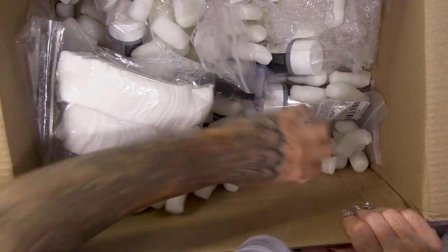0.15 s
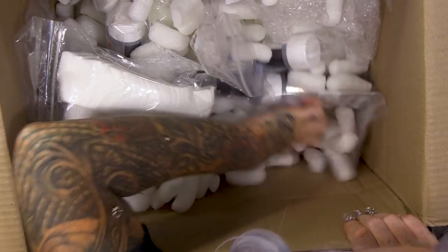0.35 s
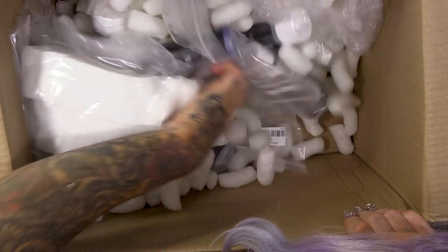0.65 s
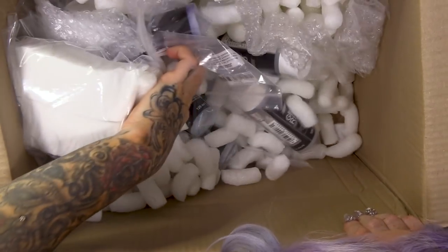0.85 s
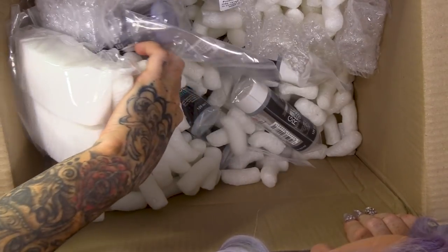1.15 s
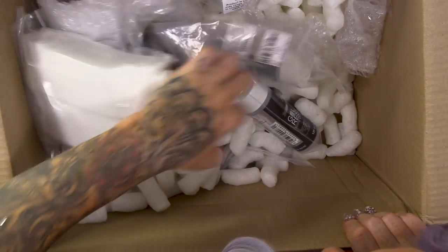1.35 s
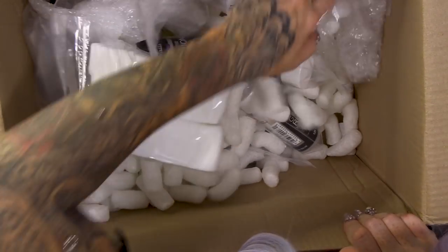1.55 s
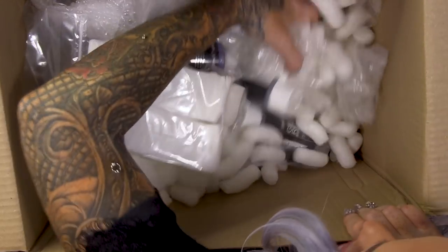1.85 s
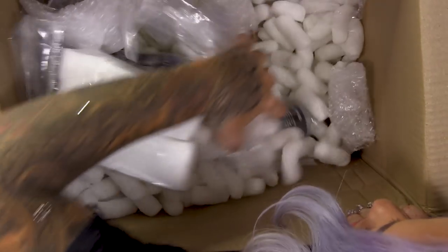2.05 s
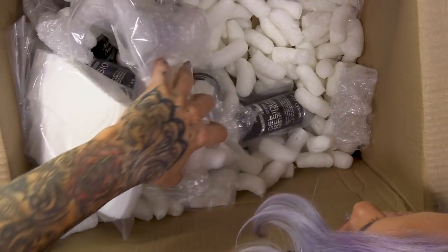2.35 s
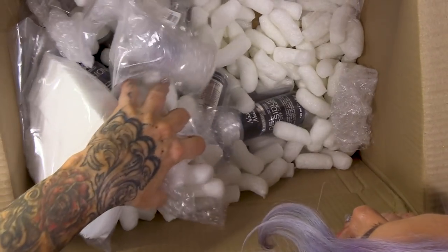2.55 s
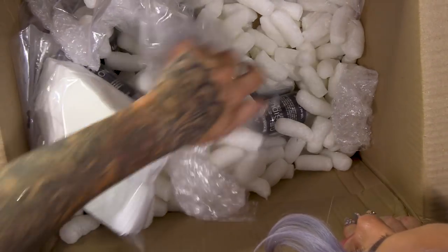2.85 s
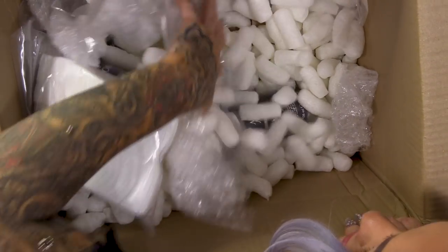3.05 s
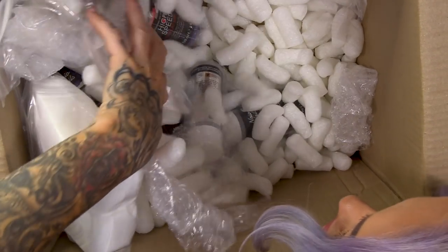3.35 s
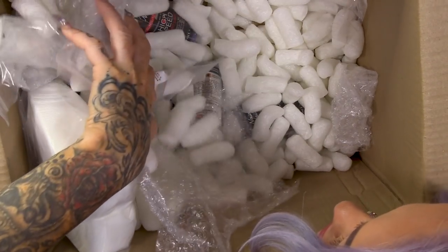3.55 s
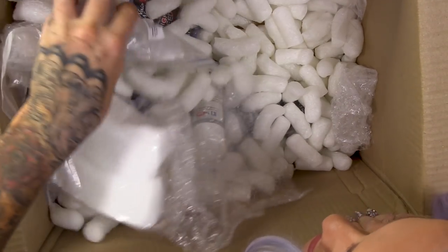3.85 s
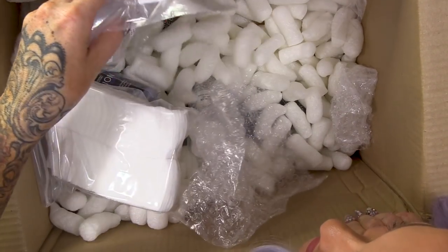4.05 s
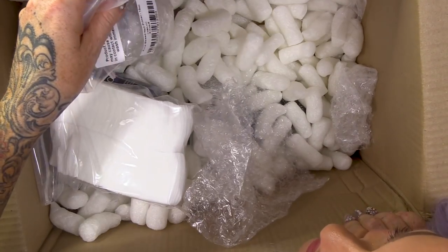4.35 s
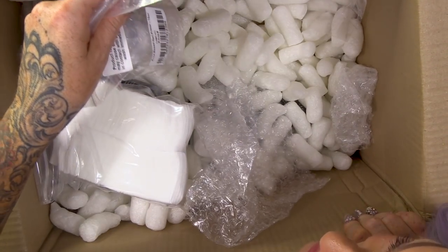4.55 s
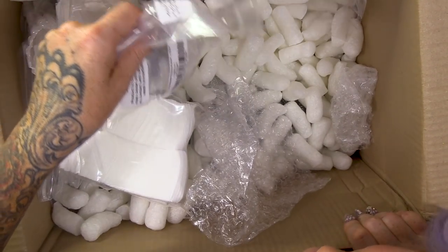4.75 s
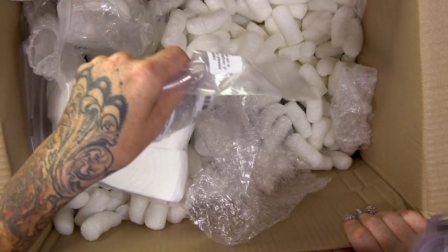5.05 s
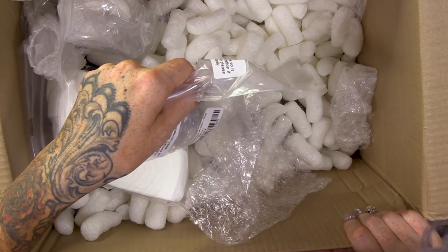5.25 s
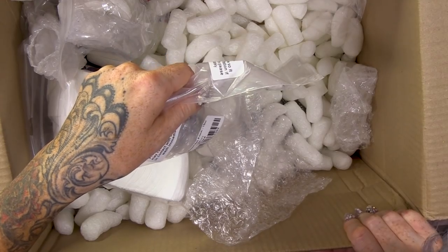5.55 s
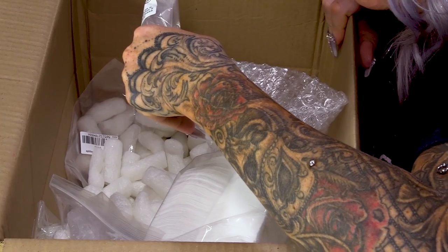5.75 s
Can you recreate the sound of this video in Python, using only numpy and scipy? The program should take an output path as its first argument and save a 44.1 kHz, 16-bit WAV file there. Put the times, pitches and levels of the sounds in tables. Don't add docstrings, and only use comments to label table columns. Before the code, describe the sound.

A hand digs through foam packing and crackly plastic, bumping cardboard, then pulls out a bag whose crinkles thin to tiny ticks.

```python
import sys
import numpy as np
from scipy import signal
from scipy.io import wavfile
from scipy.ndimage import uniform_filter1d

SR = 44100
rng = np.random.default_rng(int(sys.argv[2]) if len(sys.argv) > 2 else 0)


def makeup_ratio(level_db):
    decades = np.asarray(level_db, float) / 20
    return 10 ** decades


def digitize_waveform(pressure):
    field = np.atleast_2d(pressure).T
    bounded = np.clip(field, -1, 1)
    quanta = np.round(bounded * 32767).astype(np.int16)
    wavfile.write(sys.argv[1], SR, quanta)


N = 260217

# start_s, share
SMOOTH_SHARE = [(0, 1), (3.3, 0.95), (3.7, .8), (4.2, 0.65), (5.25, 0.65), (5.4, .6), (5.9, 0.6)]
STREAK_DB = 5


def evened(x):
    return x / np.sqrt(np.mean(x ** 2) + 1e-20)


def coloured(x, points):
    f, db = np.transpose(points)
    hz = abs(np.fft.fftfreq(8192, 1 / SR))
    log_gain = np.log(makeup_ratio(np.interp(np.log(hz + 1), np.log(f), db, -70, -70)))
    taps = np.fft.ifft(np.exp(np.conj(signal.hilbert(log_gain)))).real[:4096]
    return signal.oaconvolve(x, taps)[:len(x)]


def coloured_noise(points):
    return evened(coloured(rng.standard_normal(N), points))


def add(mix, s, sound):
    part = mix[round(s * SR):][:len(sound)]
    part += sound[:len(part)]


def drift(rate_hz):
    lowpass = signal.butter(2, rate_hz, fs=SR, output="sos")
    return evened(signal.sosfilt(lowpass, rng.standard_normal(N)))


def grains(per_s, spread_db, burst_s, bed, clumps):
    size = makeup_ratio(spread_db * np.minimum(rng.exponential(1, N), 4))
    size = size * (rng.random(N) < per_s / SR * np.exp(clumps))
    kind = rng.integers(0, 10, N)
    t = np.arange(600) / SR
    out = np.zeros(N)
    for k, burst in enumerate(rng.standard_normal((10, 600))):
        age = t / (burst_s * (0.38 + k / 12))
        shape = burst * age * np.exp(-age)
        out += signal.oaconvolve(size * (kind == k), shape / np.linalg.norm(shape))[:N]
    return evened(out) + bed * rng.standard_normal(N)


def patches(x, centres_hz, width):
    out = 0
    for hz in np.clip(centres_hz, 300, 17000):
        r = np.exp(-np.pi * width * hz / SR)
        stage = [1 - r, 0, r - 1, 1, -2 * r * np.cos(2 * np.pi * hz / SR), r * r]
        out = out + signal.sosfilt([stage, stage], x)
    return out / abs(out).max()


def patchy(x, depth_db, frames=12, bins=14):
    z = signal.stft(x, nperseg=256, noverlap=192)[2]
    field = uniform_filter1d(rng.standard_normal(z.T.shape), size=frames, axis=0)
    field = uniform_filter1d(field, size=bins, axis=1)
    depth_db = np.interp(np.arange(len(field)) * 64, np.arange(N), depth_db)[:, None]
    return signal.istft(z * makeup_ratio(depth_db * evened(field)).T, nperseg=256, noverlap=192)[1][:N]


def quiet_floor():
    # pitch_hz, level_db (per Hz)
    air_colour = [(25, 5), (90, 2), (180, -28), (500, -4), (1500, -27.5), (4000, -26), (8000, -31.5),
                  (11800, -33.5), (12600, -53.5)]
    # pitch_hz, level_db
    appliance = (2230, -105)
    whine_hz, whine_db = appliance
    air = patchy(makeup_ratio(-78) * coloured_noise(air_colour), np.full(N, STREAK_DB), 40, 1)
    return air + makeup_ratio(whine_db) * np.sin(2 * np.pi * whine_hz * np.arange(N) / SR)


def room(x, t60):
    t = np.arange(9000) / SR
    taps = rng.choice([-1., 1.], len(t)) * (rng.random(len(t)) < .06)
    taps = taps * makeup_ratio(-60 * t / t60) * (t > .001)
    return signal.oaconvolve(x, taps / np.linalg.norm(taps))[:N]


def knocks():
    # start_s, peak_db, wall_hz, t60_s
    blows = [(0.2997, -4, 198, 0.021), (0.309, -15.5, 238, 0.027), (1.5935, -9, 566, 0.01),
             (1.596, -12, 980, 0.0086), (1.5995, -4, 520, 0.006), (0.279, -23, 470, 0.041),
             (1.625, -19, 272, 0.036), (1.6333, -16.5, 376, 0.03), (1.6415, -16.5, 388, .04),
             (1.708, -17.5, 460, 0.037), (1.6055, -11.5, 171, 0.071), (1.606, -9, 527, 0.013),
             (1.6115, -2, 210, 0.02), (1.623, -19, 129.6, 0.04), (1.641, -18, 95.6, 0.17),
             (1.6745, -2, 172, 0.031), (1.6804, -6.5, 290, 0.0266), (1.681, -10.5, 101, 0.062),
             (1.7, -15.5, 440, 0.047), (2.2286, -14, 282, 0.021), (2.237, -15, 74.4, 0.074),
             (2.272, -26, 94, .06), (2.579, -15.5, 202, 0.034), (3.054, -16, 296, 0.018),
             (3.283, -23, 154, 0.067), (3.801, -29.5, 286, 0.05), (3.863, -35.5, 109, 0.14),
             (5.075, -53, 865, 0.16), (5.236, -55, 559, .1), (5.325, -66, 333, .12),
             (5.742, -55, 630, 0.063), (5.486, -49, 1382, 0.065)]
    # factor (on pitch), level_db
    wall_modes = [(1.003, 1.5), (0.754, -4), (2.21, -10)]
    out = np.zeros(N)
    t = np.arange(9000) / SR
    for s, db, hz, t60 in blows:
        modes = sum(makeup_ratio(mode_db) * np.sin(2 * np.pi * factor * hz * t) for factor, mode_db in wall_modes)
        soft_attack = np.sin(np.pi / 2 * np.minimum(t * hz / 1.18, 1))
        add(out, s, makeup_ratio(db - 0.5 - 60 * t / t60) * modes * soft_attack)
    return out


def film_ticks():
    # start_s, peak_db
    dig_ticks = [(0.1372, -34.6), (0.2467, -45), (0.611, -30.5), (0.6357, -32.5), (0.6753, -33),
                 (0.727, -34.8), (0.7555, -27), (0.7724, -29), (0.7979, -32), (0.8236, -34), (0.8587, -31),
                 (0.9121, -45), (1.0378, -36), (1.0744, -39), (1.113, -41), (1.1207, -40), (1.1409, -39.2),
                 (1.1522, -40), (1.162, -34), (1.1744, -40.6), (1.1863, -42.3), (1.2448, -41),
                 (1.4174, -39.3), (1.4644, -43), (1.77, -33), (2.0749, -36.1), (2.2136, -26), (2.2843, -34),
                 (2.3676, -36), (2.415, -44.8), (2.4206, -41.1), (2.4257, -43.5), (2.4958, -41),
                 (2.5158, -36.6), (2.5271, -41), (2.5343, -26), (2.5814, -46), (2.6496, -31), (2.7097, -42),
                 (2.7307, -39.3), (2.8466, -40), (2.8839, -38), (2.9556, -33), (2.9635, -33), (3.0003, -34),
                 (3.1113, -30), (3.1934, -25), (3.3821, -34)]
    # start_s, peak_db
    bag_ticks = [(3.5049, -34), (3.5775, -38), (3.667, -35), (3.6781, -31.7), (3.6918, -35), (3.7027, -35),
                 (3.7347, -34), (3.7759, -38), (3.788, -38), (3.8251, -34), (3.834, -37.7), (3.8395, -35),
                 (3.8464, -31), (3.9038, -35.6), (4.1857, -45), (4.1936, -48), (4.2064, -42),
                 (4.2685, -40.3), (4.2959, -33.0), (4.3052, -32), (4.3197, -37), (4.3434, -39),
                 (4.3629, -40.0), (4.3717, -47), (4.4103, -30), (4.4216, -42.3), (4.4497, -39),
                 (4.4581, -40), (4.4719, -39), (4.5256, -46), (4.5309, -47), (4.5544, -33.5),
                 (4.6497, -45.3), (4.6709, -40), (4.742, -45), (4.8121, -48), (4.8672, -51.7),
                 (4.8953, -47.2), (4.905, -34), (5.0113, -44), (5.0936, -46), (5.12, -56.8), (5.1411, -52),
                 (5.1988, -53.2), (5.3872, -72), (5.3966, -74), (5.6076, -77.0), (5.7255, -61.5)]
    ticks = list(dig_ticks) + list(bag_ticks)
    out = np.zeros(N)
    age = np.arange(300) / SR / 0.00036
    for (s, db), noise in zip(ticks, rng.standard_normal((len(ticks), 303))):
        centres_hz = np.array([9500, 11500, 14000]) * np.exp(0.033 * noise[:3])
        add(out, s - 0.0005, makeup_ratio(db) * patches(noise[3:] * age * np.exp(-age), centres_hz, 0.5))
    return out


def fold_snaps():
    # start_s, peak_db, ring_hz, dull_part_db, length_ms
    dig_folds = [(0.0254, -28.5, 3510, -21, 1.1), (0.1374, -28, 7240, -7, 1.7),
                 (0.1513, -24, 2260, -12, 0.68), (0.1842, -29.5, 4820, -5, 1.5),
                 (0.2307, -34.5, 2350, 6.5, 1.2), (0.254, -33, 1610, 8, 1.5), (0.2914, -19, 2390, -3, 2.8),
                 (0.6114, -17.5, 5860, -12, 0.66), (0.6673, -24.5, 1610, -33, 1.7),
                 (0.8847, -28.5, 2370, 4, 1.1), (1.1032, -25.5, 1610, -3.5, 1.4),
                 (1.113, -24.2, 3660, -5, 1.0), (1.1209, -29, 5730, -13, 1.6),
                 (1.1413, -32, 2990, -12, 1.0), (1.1531, -30.3, 3120, -15, 1.6),
                 (1.1621, -29, 3140, -24, 0.73), (1.1745, -31, 4290, -17, 0.8),
                 (1.2468, -28.3, 5150, -1.5, 1.6), (1.4191, -30, 2350, -30, 1.5),
                 (1.4484, -29.5, 2430, -12, 1.3), (1.4646, -25, 5210, -20.5, 0.63),
                 (1.5947, -20, 2150, -4.5, 1.1), (1.661, -14, 2070, 0, 1.2),
                 (1.9351, -22.5, 3230, -11, 2.1), (2.0009, -27, 1810, -30, 1.1),
                 (2.2139, -16.0, 2170, -2, 1.9), (2.3677, -29, 3730, -30, 0.8),
                 (2.4208, -27.5, 1960, -5, 1.53), (2.4262, -29.5, 1610, 4, 1.3),
                 (2.4851, -29, 2580, 0, 0.88), (2.5078, -34, 2510, 1, 1.55), (2.5355, -20, 4610, -6, 1.3),
                 (2.5472, -40, 1920, -14, 1.2), (2.5812, -29, 2130, -8, 1.1)]
    # start_s, peak_db, ring_hz, dull_part_db, length_ms
    grip_folds = [(2.6082, -29.3, 2060, -30, 1.5), (2.631, -24.5, 1610, 2, 1.4),
                  (2.71, -22.8, 7300, -11, 1.26), (2.748, -29, 3190, -12, 0.93),
                  (2.864, -33, 2050, -30, 1.5), (2.8745, -25.6, 4770, -30, 0.8),
                  (2.8953, -28, 5510, -30, 0.7), (2.9327, -31, 4820, -3, 2.3),
                  (3.0004, -24.4, 3340, -30, 2), (3.0084, -29, 2670, -16, 1.2),
                  (3.0622, -17.5, 3350, 0, 1.9), (3.0791, -24, 2050, -4, 1.2),
                  (3.1936, -30, 2330, -2, 0.89), (3.3709, -31.3, 1600, 0, 1.8),
                  (3.3818, -28, 6960, -30, 1.7), (3.391, -28, 2450, -4, 0.97), (3.4565, -31, 4740, -30, 1),
                  (3.4813, -32, 5100, -13, 1.3), (3.505, -24.5, 3760, -1, 2.1), (3.5111, -29, 3290, 1, 1.5),
                  (3.569, -33.8, 4820, -30, 1.0), (3.5784, -32, 4290, -15, 1.7),
                  (3.6664, -22, 6540, -15, 1.5), (3.679, -25, 5800, -28, 1.5),
                  (3.703, -25.5, 5340, -26, 1.8), (3.826, -24, 5030, -4, 1.1),
                  (3.8341, -25.8, 2460, -30, 1.3), (3.8387, -28, 1610, -4, 1.3),
                  (3.859, -29, 5360, -30, 0.9), (3.8863, -33.1, 2110, -19, 2.8),
                  (3.9038, -24, 5000, -16, 0.74), (3.911, -23.5, 3230, -8, 0.82),
                  (3.9595, -29, 3750, -6, 0.95), (3.9676, -23.5, 2820, -6, 0.8)]
    # start_s, peak_db, ring_hz, dull_part_db, length_ms
    lift_folds = [(4.0622, -24, 2840, -16, 1.5), (4.0746, -32, 3250, -6, 1.7),
                  (4.1224, -29, 8160, -15, 1.65), (4.1584, -39, 2260, -30, 0.8),
                  (4.1657, -38, 2540, -30, 0.65), (4.1856, -27, 2040, -8, 2.4),
                  (4.1937, -21, 3650, -24, 0.92), (4.2067, -28, 2140, -5, 2.1),
                  (4.2366, -37, 2630, -32, 0.83), (4.252, -28, 2340, -30, 1.25),
                  (4.2581, -36, 3620, -15, 0.9), (4.2682, -30.5, 1610, -7, 1.5),
                  (4.2959, -29, 5660, -21, 1.4), (4.3055, -25, 6350, -12, 0.84),
                  (4.3198, -21.5, 6200, -26, 0.91), (4.3434, -22.5, 8540, -16, 1.1),
                  (4.362, -31, 4950, -13, 1.4), (4.3715, -29, 2310, -9, 0.9), (4.3785, -27, 3300, -16, 1.1),
                  (4.384, -32, 4930, 0, 1.1), (4.4103, -19, 3580, -9, 1.6), (4.421, -34.5, 2330, -5, 1.8),
                  (4.4488, -27, 3550, -24, 1.6), (4.4725, -27, 5250, -21, 0.93),
                  (4.4832, -30, 2760, -9, 1.2), (4.5255, -37, 2465, -22, 2.1),
                  (4.5309, -18, 3540, -32, 0.68), (4.5527, -29.3, 3010, -6, 2),
                  (4.6382, -38, 2370, -23, 1.4), (4.644, -44, 2430, -30, 1.3), (4.649, -37, 5900, -25, 1.6),
                  (4.6711, -33, 4310, 0, 1.9), (4.6797, -40, 3060, -9, 1.4), (4.6973, -37, 2450, -17, 2.4)]
    # start_s, peak_db, ring_hz, dull_part_db, length_ms
    held_folds = [(4.741, -38, 2240, -5, 2.4), (4.7667, -37, 2500, 3, 1.1), (4.7766, -46, 2050, -13, 1.1),
                  (4.8121, -38.5, 4780, -10, 1.2), (4.8671, -34.5, 2300, -18, 1.4),
                  (4.8951, -33.5, 5040, 2.5, 3.3), (4.9049, -26, 3550, -11, 2),
                  (4.915, -35, 4590, -21, 1.7), (4.942, -35.5, 3960, -5, 1.5),
                  (5.0118, -34.5, 5770, -24, 1.13), (5.0653, -43, 4520, -32, 1.0),
                  (5.0796, -47, 1790, -6, 1.9), (5.0936, -32, 2860, -26, 1.3),
                  (5.12, -33.5, 1700, -10, 1.36), (5.1417, -34, 3800, -22, 1.6),
                  (5.1839, -40, 2580, -11, 1.8), (5.1994, -32, 1630, -8, 1.03),
                  (5.2398, -48, 1610, -3, 1.1), (5.278, -52, 5960, -16, 1.0), (5.291, -43, 4780, -1.5, 1.7),
                  (5.3873, -53, 3080, -15, 1.1), (5.394, -55, 2800, -3, 2.5),
                  (5.464, -60.8, 3120, -16, 1.2), (5.4862, -62, 1610, 10, 3.1), (5.4934, -58, 1630, 9, 2.2),
                  (5.51, -56, 2650, -13, 1.1), (5.5926, -65, 2430, -9.5, 2.1), (5.6064, -56, 1760, -1, 1.5),
                  (5.6807, -74, 2020, -5, 0.82), (5.7243, -42.3, 5570, -6, 1.6),
                  (5.73, -54.5, 5990, 11, 2.8), (5.8214, -64, 4670, -3, 1.0), (5.8588, -62, 4820, -30, 1.4),
                  (5.8685, -53, 5550, -18, 1.1)]
    folds = list(dig_folds) + list(grip_folds) + list(lift_folds) + list(held_folds)
    edge_band = signal.butter(4, (900, 8200), "bandpass", fs=SR, output="sos")
    pop_band = signal.butter(3, (1200, 8500), "bandpass", fs=SR, output="sos")
    pop_share = 1.2
    out = np.zeros(N)
    lead = 300
    since = (np.arange(1400) - lead) / SR
    for (s, db, hz, low_db, ms), noise in zip(folds, rng.standard_normal((len(folds), 2, 1410))):
        slip_s = max(ms - .55, .2) / 1000
        creep = np.exp(since / (.7 * slip_s))
        let_go = np.exp(-since / slip_s) + 0.084 * np.exp(-since / 0.0044)
        shape = np.where(since < 0, creep, let_go)
        unevenness = evened(uniform_filter1d(noise[1, 10:], size=24))
        slips = makeup_ratio(3.5 * unevenness * (abs(since) > .0006))
        crack = noise[0, 10:] * shape * slips
        detune = np.exp(0.13 * noise[0, :10])

        main = patches(crack, [hz], .33)
        main += .55 * patches(crack, np.array([2200, 3500, 5200]) * detune[:3], .4)
        edge = signal.sosfilt(edge_band, crack)
        pop = signal.sosfilt(pop_band, np.sign(noise[0, 9]) * (np.arange(1400) == lead))
        main += 1.1 * edge / abs(edge).max() + pop_share / ms * pop / abs(pop).max()
        dull = makeup_ratio(low_db) * patches(crack, np.array([600, 900, 1300]) * detune[4:7], 0.75)
        peak_s = np.argmax(abs(main)) / SR
        add(out, s - peak_s, makeup_ratio(db) * (main / abs(main).max() + dull))
    return out


def palm_slide():
    # pitch_hz, level_db (per Hz)
    slide_colour = [(2500, -23), (3200, -6.5), (4100, -23.5), (4900, -0.5), (6500, -6.5), (7600, -3.5),
                    (9000, -7), (10500, -14.5), (12000, -4.5), (13500, -18), (16000, -16)]
    end_s = 0.18
    fade = 1 + (np.arange(N) / SR / end_s) ** 4
    return makeup_ratio(-46) / fade * coloured_noise(slide_colour)


def effort(t):
    # start_s, foam_db, bag_db, film_db (against bag)
    settling = [(0, -46.5, -49, -13), (.22, -48, -49.5, -13.5), (.95, -43, -43.5, -11.5),
                (1.3, -43.5, -46, -6.5), (1.6, -43, -43, -6.5), (1.82, -38, -42, -10.5),
                (2.2, -40, -41, -6.5), (2.4, -47, -48.5, -12), (2.901, -44.5, -43.5, -8),
                (3.55, -46.5, -47.5, -4.5), (3.8, -43.5, -40, -9), (4.1, -51.5, -46, -4),
                (4.4, -48, -47, -11), (4.52, -58.5, -50, -7), (4.87, -63.5, -54, -10),
                (5.02, -71.5, -56, -14), (5.34, -85, -85, -37), (5.9, -77, -71, -24)]
    # start_s, hold_s, foam_db, bag_db, push_db (on the box)
    hand_strokes = [(.12, 0.058, -59, -64, -59), (0, 0.059, -62, -56, -49), (.286, .028, -29, -32.5, -37),
                    (0.325, .07, -40, -42, -35.5), (0.426, 0.044, -30, -35, -43),
                    (0.49, .2, -35.5, -40.5, -43), (0.724, 0.13, -32.5, -34.5, -39.5),
                    (1.003, 0.25, -88, -65, -58), (1.252, 0.23, -65, -62, -51.5),
                    (1.604, 0.042, -34, -37.5, -31), (1.655, 0.0097, -36, -37.5, -41),
                    (1.68, 0.021, -30, -36.5, -39), (1.732, 0.023, -34.5, -36, -31),
                    (1.843, 0.39, -36, -40, -40.5), (2.168, 0.047, -36, -36, -35),
                    (2.273, 0.16, -46.5, -45, -47), (2.484, 0.22, -42, -43.5, -45.5),
                    (2.694, 0.054, -51, -53, -55), (2.993, 0.15, -36.5, -38.5, -39),
                    (3.186, 0.11, -35.5, -37, -39), (3.416, 0.084, -46.5, -43.5, -49.5),
                    (3.672, 0.045, -43, -43.5, -57), (3.89, 0.11, -48.5, -61, -52.5),
                    (4.066, 0.025, -44, -40.5, -49), (4.267, 0.041, -51, -67, -62),
                    (4.497, 0.13, -69, -72, -76), (4.854, 0.092, -56, -61, -72),
                    (4.719, 0.059, -51.5, -55, -71), (5.08, .14, -59, -56.5, -91),
                    (5.386, 0.017, -68, -71, -82), (5.486, 0.0097, -68, -68.5, -88),
                    (5.596, 0.011, -75, -74, -86.5), (5.727, 0.04, -72, -76, -87)]
    rise_db_s, fall_db_s = 550, 165
    s, foam_db, bag_db, film_db = np.transpose(settling)
    foam_db, bag_db = np.interp(t, s, foam_db), np.interp(t, s, bag_db)
    lean_db = np.maximum(-60 + 1.9 * (foam_db + 44), -92)
    power = makeup_ratio([foam_db, bag_db, lean_db]) ** 2
    for start, hold, *levels_db in hand_strokes:
        drop_db = np.maximum(rise_db_s * (start - t), fall_db_s * (t - start - hold)).clip(0)
        power = power + makeup_ratio(np.array(levels_db)[:, None] - drop_db) ** 2
    foam, bag, push = np.sqrt(power)
    return push, foam, bag, bag * makeup_ratio(np.interp(t, s, film_db))


def rummage():
    # pitch_hz, level_db (per Hz)
    push_colour = [(15, -6), (30, 8.5), (46, -13.5), (65, 0), (100, 2.5), (140, -6), (220, -23)]
    drum_colour = [(90, -25.5), (170, 1.5), (240, -2), (400, -18)]
    foam_colour = [(150, -34), (300, -2.5), (450, -5), (800, -7), (1400, -6.5), (2500, -13), (3800, -24),
                   (6000, -35)]
    bag_colour = [(500, -11), (1500, -4), (2400, 1.5), (3500, -0.5), (5000, -4), (8000, -16), (9500, -26),
                  (14000, -30)]
    film_colour = [(4000, -1.5), (7000, 7), (10500, -1), (15500, -6), (17000, -31.5)]
    t = np.arange(N) / SR
    coarse = np.arange(0, N, 32) / SR
    push, foam, bag, film = (np.interp(t, coarse, level) for level in effort(coarse))
    flurry = drift(30)
    smooth = np.interp(t, *np.transpose(SMOOTH_SHARE))
    crinkle = grains(500, 3.9, 0.00052, 1.34 * smooth, .4 * flurry)
    tumble = grains(900, 2.95, 0.0019, 1.005, .3 * flurry) + 0.44 * crinkle
    sizzle = grains(360, 1.7, 0.00089, 1.6 * smooth, 0.4 * flurry) + 0.069 * crinkle

    out = push * makeup_ratio(-1.5 + 1.3 * drift(15.0)) * coloured_noise(push_colour)
    out += np.sqrt(push * foam) * makeup_ratio(-4.0) * evened(coloured(tumble, drum_colour))
    out += foam * makeup_ratio(1.0 + 0.22 * flurry) * evened(coloured(tumble, foam_colour))
    out += bag * makeup_ratio(-1.0 + 0.15 * flurry) * evened(coloured(crinkle, bag_colour))
    out += film * makeup_ratio(-2.5 + 0.39 * flurry) * evened(coloured(sizzle, film_colour))
    return out


def scene():
    t = np.arange(N) / SR
    quiet = quiet_floor()
    cracks = fold_snaps() + film_ticks()
    near = rummage() + palm_slide()
    wash = near + makeup_ratio(-22.5) * room(near, 0.093) + makeup_ratio(-9.5) * room(cracks, 0.091)
    smooth = np.interp(t, *np.transpose(SMOOTH_SHARE))
    wash = patchy(wash, 3.2 - 2.4 * smooth)
    still_s = 5.25
    streak_db = STREAK_DB * np.clip((t - still_s) / .1, 0, 1)
    return (patchy(wash, streak_db, 40, 2) + cracks + knocks() + quiet)[None]


def top_cut(x):
    return signal.sosfilt(signal.butter(12, 16820, fs=SR, output="sos"), x)


def record(dry):
    edge_hz, top_hz, top_gate_db = 16050, 12400, -79
    band_limit = signal.firwin(401, edge_hz, window=("kaiser", 5), fs=SR)
    limited = signal.oaconvolve(dry, band_limit[None], "same")
    highpass = signal.firwin(201, top_hz, pass_zero=False, fs=SR)
    top = signal.oaconvolve(limited, highpass[None], "same")
    top_db = 10 * np.log10(abs(uniform_filter1d(top ** 2, size=2048)) + 1e-14)
    faint = uniform_filter1d((top_db < top_gate_db) * 1., size=512)
    return top_cut(limited - top * faint)


dry = scene()
out = record(dry)
digitize_waveform(out)
```